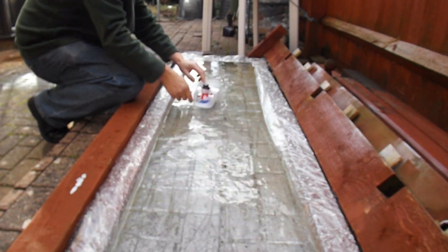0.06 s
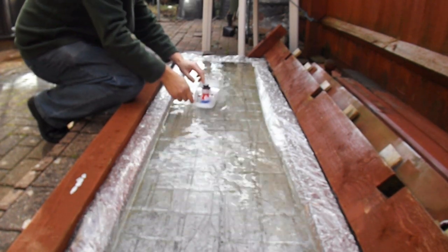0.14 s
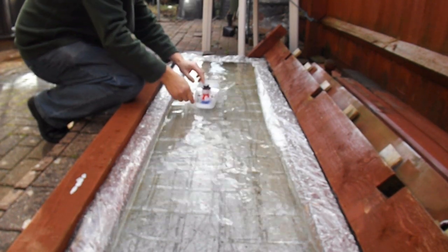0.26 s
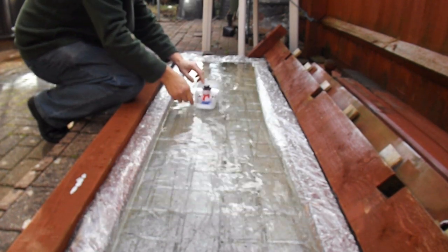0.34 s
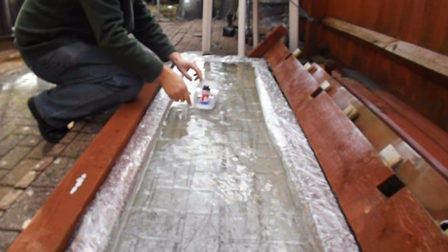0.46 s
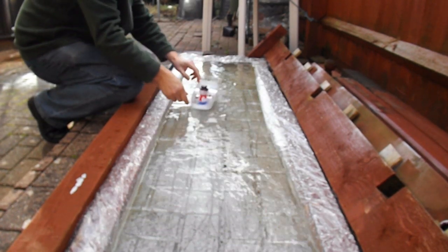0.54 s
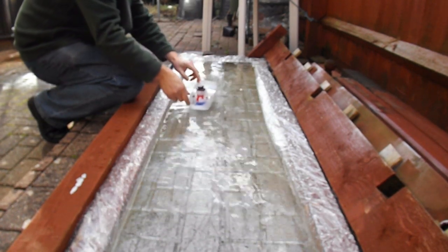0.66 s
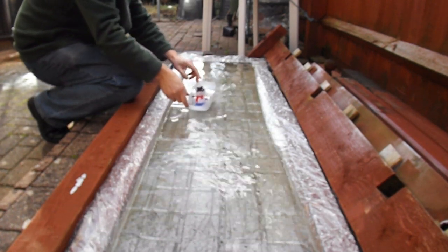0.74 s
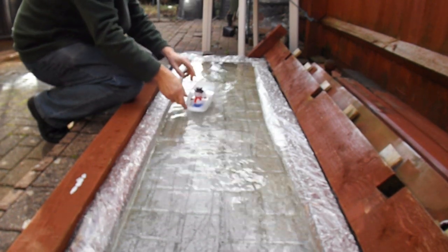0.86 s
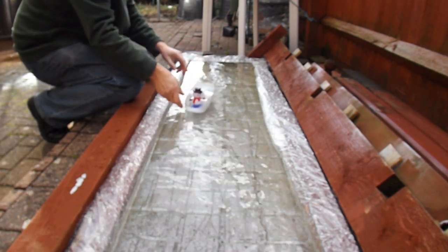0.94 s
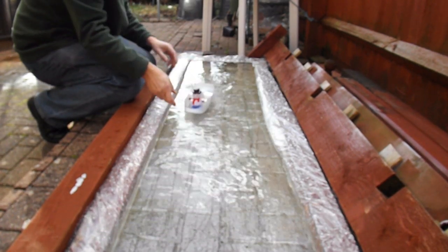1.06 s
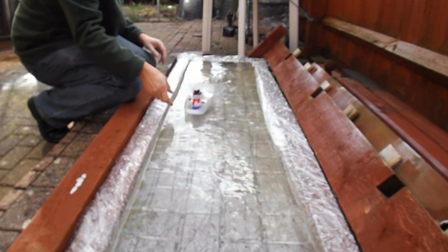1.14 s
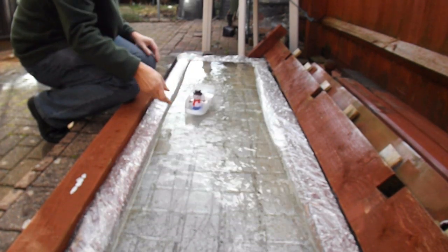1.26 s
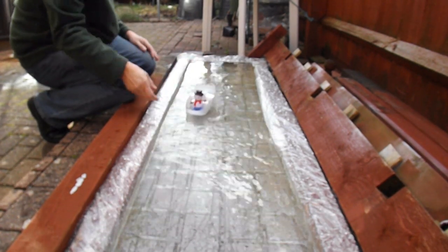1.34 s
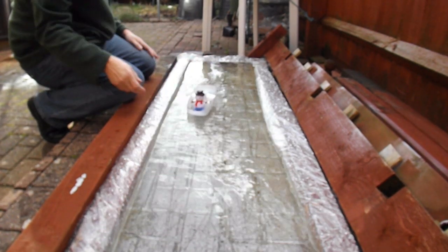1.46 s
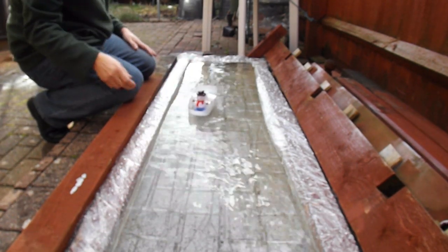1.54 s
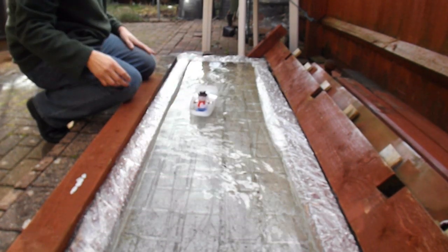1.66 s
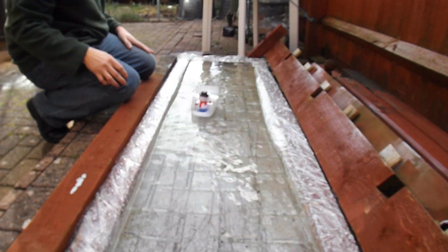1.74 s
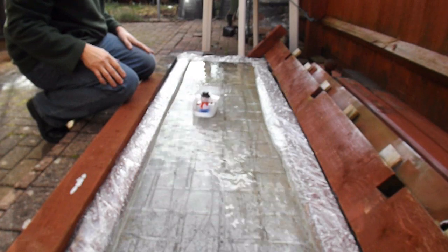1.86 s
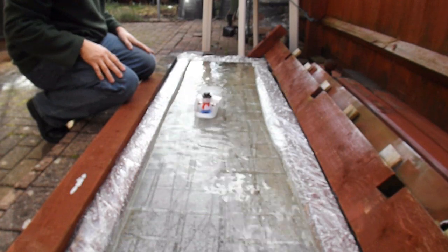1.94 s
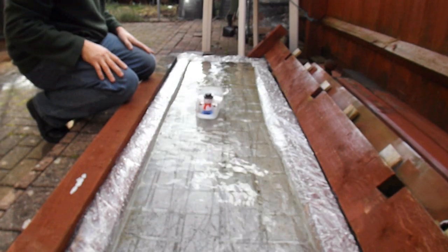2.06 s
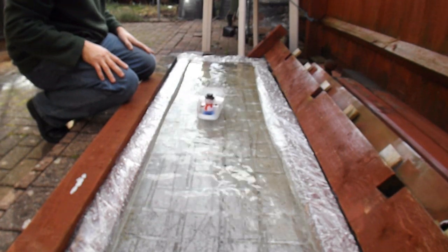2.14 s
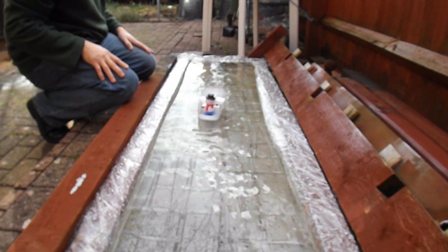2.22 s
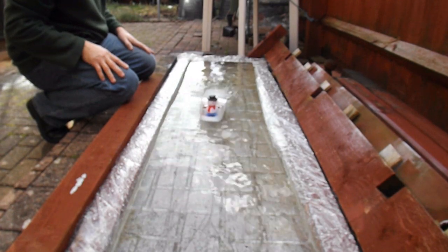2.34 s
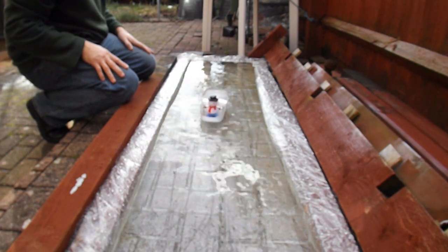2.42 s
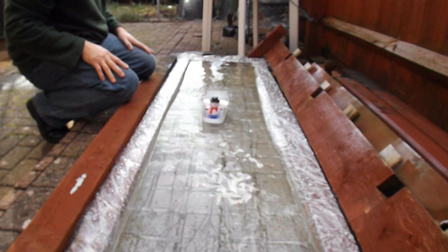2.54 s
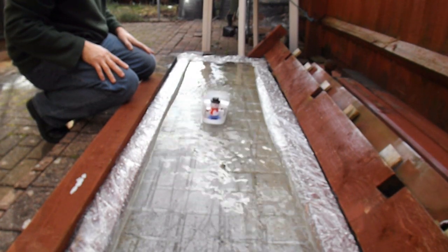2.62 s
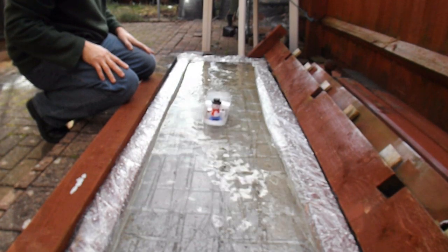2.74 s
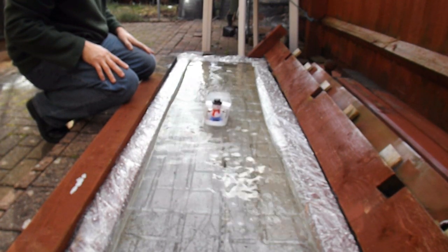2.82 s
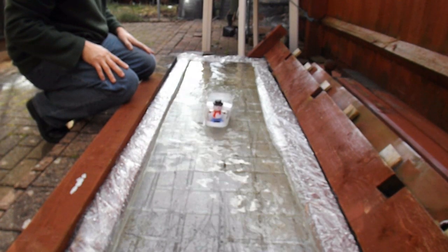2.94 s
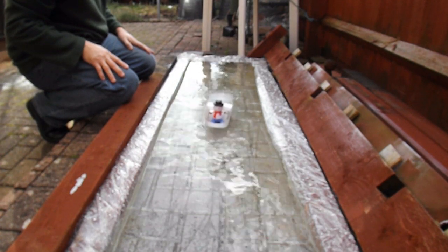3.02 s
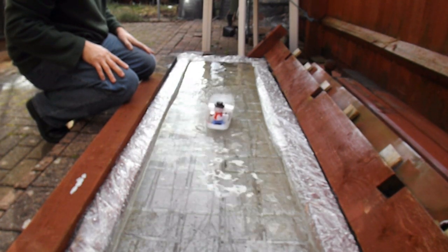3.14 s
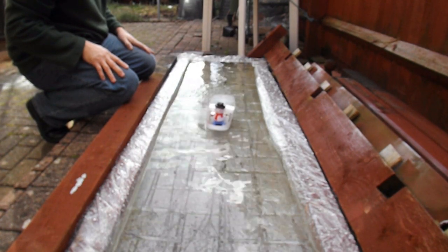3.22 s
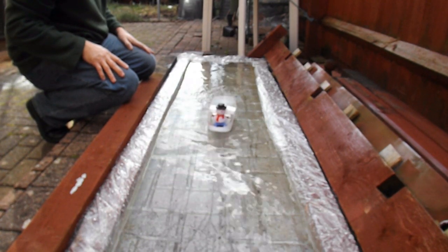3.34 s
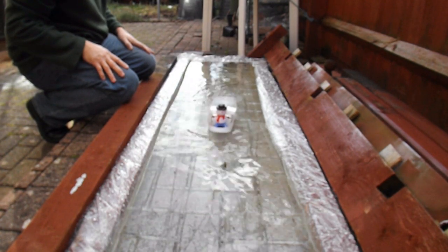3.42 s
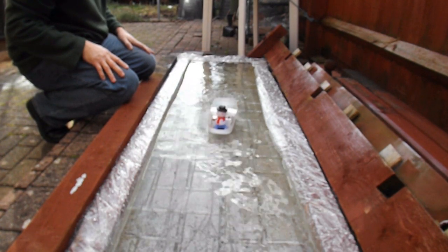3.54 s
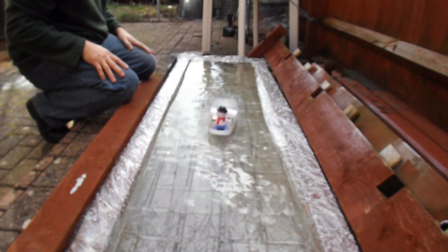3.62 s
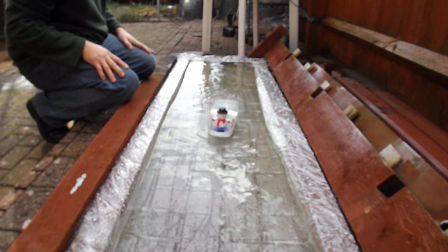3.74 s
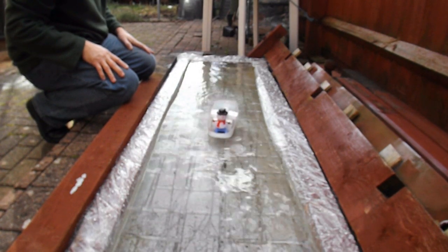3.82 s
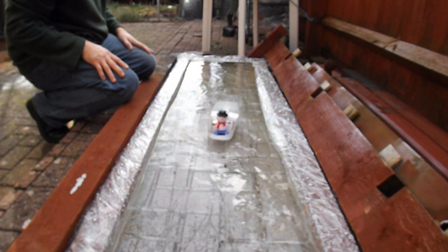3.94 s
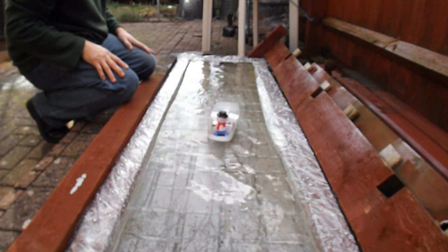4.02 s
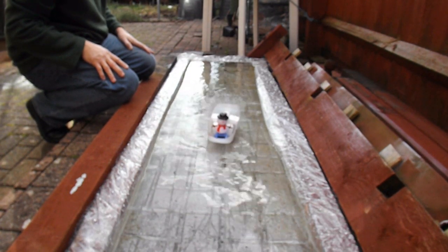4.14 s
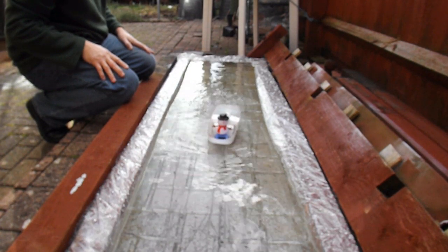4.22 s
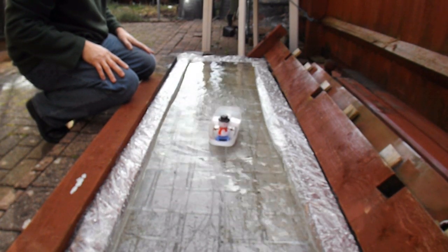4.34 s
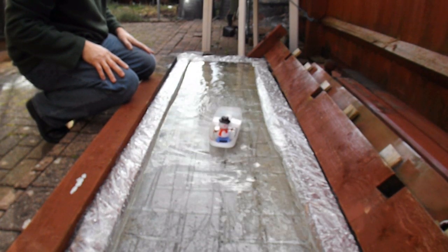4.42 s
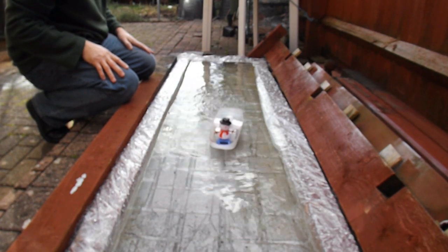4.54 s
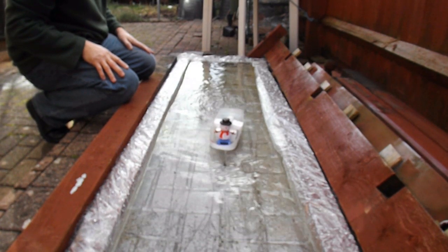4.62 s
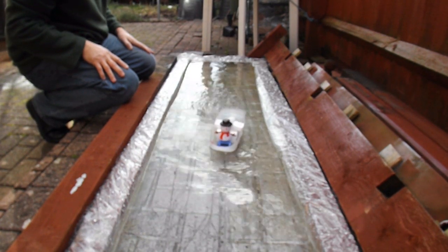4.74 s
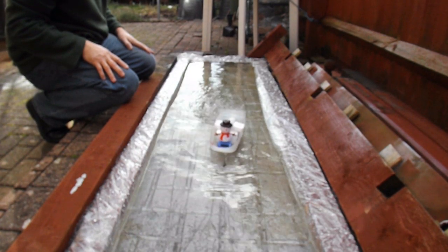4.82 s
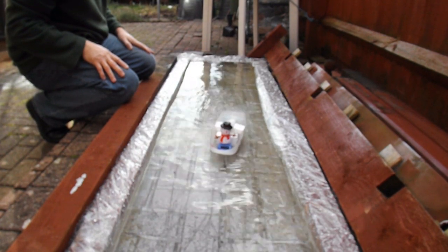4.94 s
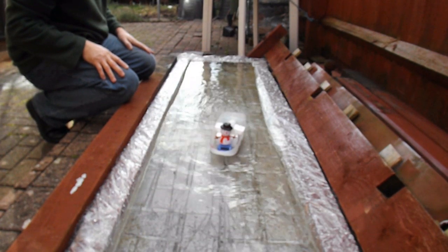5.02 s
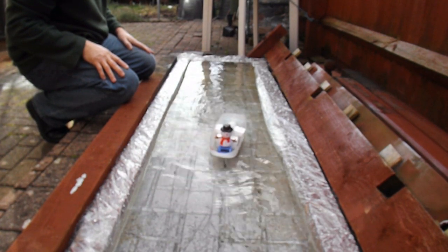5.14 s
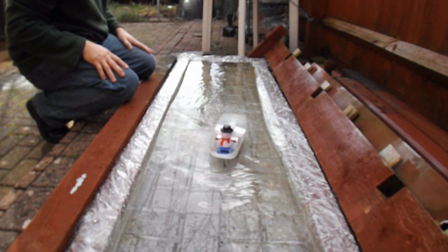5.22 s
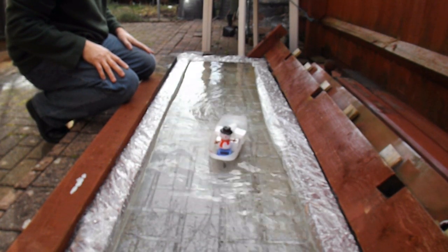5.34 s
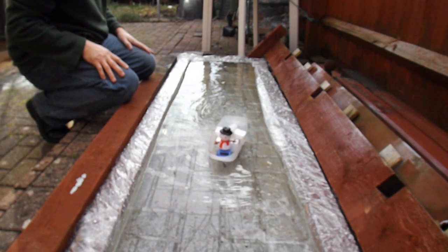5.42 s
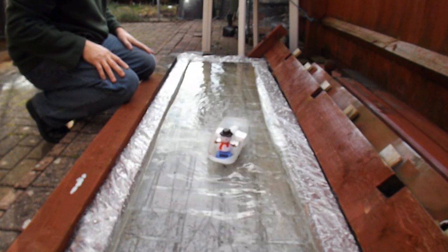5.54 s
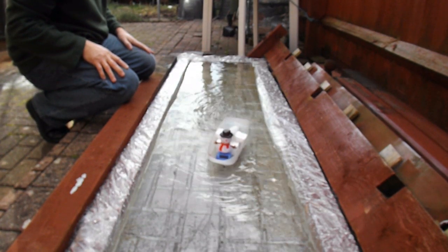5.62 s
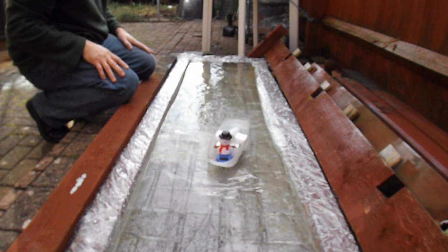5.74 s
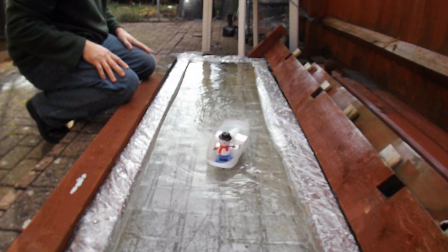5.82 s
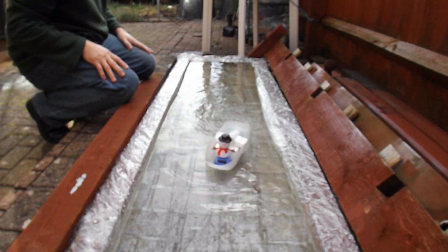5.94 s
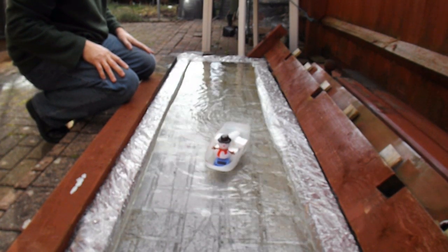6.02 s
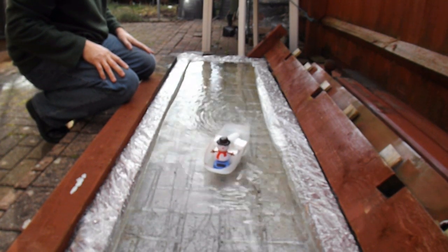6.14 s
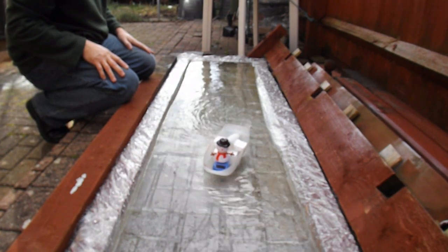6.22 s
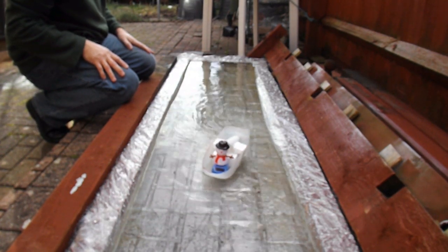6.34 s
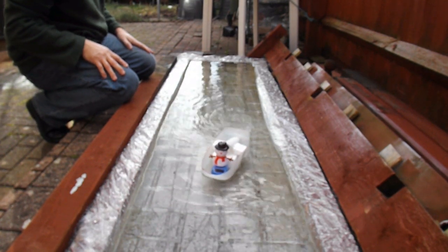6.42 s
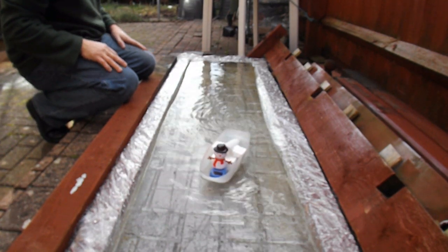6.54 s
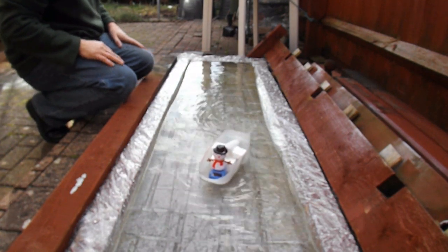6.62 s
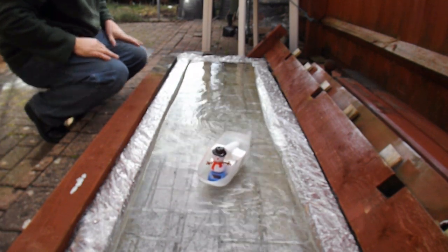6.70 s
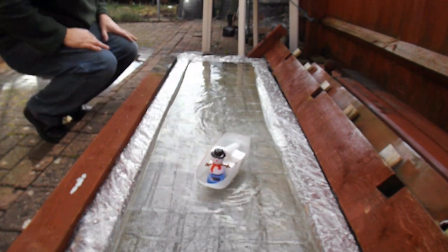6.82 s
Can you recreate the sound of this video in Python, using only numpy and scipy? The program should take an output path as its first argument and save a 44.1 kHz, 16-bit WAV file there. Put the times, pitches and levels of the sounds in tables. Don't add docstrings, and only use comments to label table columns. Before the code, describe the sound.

Outdoors, near a small camera microphone, rough wind puffs blast and pop over a constant raspy electric buzz from a toy boat. The gusts stop after about a second and a half, with one brief puff cluster later. The motor keeps buzzing, low stroke rate with a bright metallic rattle, briefly dipping under load, some overtones ringing out from the plastic hull, with faint hiss and thin high whine beneath.

```python
import sys
import numpy as np
from scipy import signal
from scipy.fft import rfft, irfft, next_fast_len
from scipy.io import wavfile
from scipy.ndimage import uniform_filter1d, map_coordinates

SR = 44100
rng = np.random.default_rng(int(sys.argv[2]) if len(sys.argv) > 2 else 0)


def elevation(decibels):
    levels = np.asarray(decibels, float)
    return 10 ** (levels / 20)


def log_audio(samples):
    frames = np.atleast_2d(samples).T
    limited = np.clip(frames, -1, 1)
    pcm = np.round(limited * 32767).astype(np.int16)
    wavfile.write(sys.argv[1], SR, pcm)


N = 302967
T = np.arange(N) / SR

# time_s, stroke_rate_hz, rattle_db
FREE = [(0.0, 87.9, -50), (0.1, 89.3, -41), (0.3, 89.83, -41.5), (1.0, 90.79, -40), (1.4, 88.4, -41.5),
        (2.0, 88.95, -40.5), (2.35, 88.95, -41.5), (2.7, 89.5, -38.5), (3.3, 88.64, -40.5),
        (3.6, 89.3, -38), (4.1, 90.17, -39.5), (4.4, 89.94, -37.5), (4.9, 89.06, -40), (5.45, 89.3, -38.5),
        (6.2, 89.4, -38), (6.45, 89.56, -37), (6.7, 89.63, -37.5), (6.87, 89.63, -39.5)]
# start_s, length_s, sag_hz
DRAGS = [
    (0.63, 0.24, 2.8),
    (1.693, 0.15, 1.2),
    (2.049, 0.13, 1.5),
    (2.622, 0.16, 1.3),
    (3.05, 0.097, 0.3995),
    (3.75, 0.22, 1.1),
    (4.452, 0.3, 1.1),
    (5.15, 0.23, 1.4),
]


def motor_drive():
    hz, rattle_db = curves(FREE)
    sag = sum(sag_hz * spell(s, length, 0.03, 0.035) for s, length, sag_hz in DRAGS)
    strain_db_per_hz = 0.24
    hz = hz - sag
    rattle_db = rattle_db + strain_db_per_hz * sag
    turns = np.cumsum(hz * (1 + 0.00136 * drift(14.2)[0])) / SR
    return hz, rattle_db, turns


def brush():
    hz, rattle_db, turns = motor_drive()
    body_db = -4.0 + 0.5 * drift(0.97)[0]
    bob_db = 0.8 * drift(10.0)[0]
    rattle_db = rattle_db + bob_db
    shake_db = 0.18 * (rattle_db + 0.5 * body_db + 45.0)
    hull = hum(turns, shake_db) * elevation(0.85 * bob_db)
    gear = gear_rattle(turns, hz, rattle_db, body_db)
    return hull + gear + hull_chatter(turns, shake_db) + shaft_lines(turns, hz)


# order (multiple of the stroke rate), level_db
ORDER_DB = [(1, -69.5), (2, -32), (3, -28.5), (4, -16), (5, -26), (6, -5.5), (7, -14.5), (8, -56), (9, -11),
            (10, -10), (11, -2), (12, -3.5), (13, -25), (14, -6.5), (15, -22.5), (16, -6.5), (17, 0),
            (18, -13.5), (19, -4.5), (20, -8.5), (21, 1), (22, 2.5), (23, -11.5), (24, -6.5), (25, -12.5),
            (26, -13), (27, -19), (28, -15.5), (29, -16.5), (30, -11)]
# order, start_s, length_s, level_db
RINGS = [(21, 0.069, 0.15, -42), (21, 0.23, .2, -45.5), (21, 0.762, 0.16, -47), (21, 2.47, 0.67, -53),
         (21, 3.55, 1.156, -54.5), (21, 6.2, 0.61, -46), (22, 1.97, 0.19, -53), (22, 2.68, .85, -47),
         (22, 3.5, 1.334, -49), (22, 5.0, 1.176, -49), (11, 2.55, 0.22, -46), (17, 1.36, 0.83, -53.5),
         (17, 3.426, 0.62, -56), (17, 4.2, 1.023, -67.5), (17, 5.38, 1.6, -46), (7, 1.358, 1.0, -55),
         (7, 2.356, 3.9, -50), (7, 6.3, .6, -56), (11, 1.49, 0.44, -53.5), (11, 2.021, 0.43, -47.5),
         (11, 3.55, 0.49, -55), (19, 2.04, 0.79, -56), (19, 2.862, 1.0, -54), (19, 3.7, 1.114, -64),
         (19, 4.8, 0.71, -49.5), (6, 2.44, 4.6, -57), (12, 5.7, 1.1, -59), (14, 5.37, .9, -55.5),
         (4, 5.4, 1.8, -66.5), (16, 3.735, 1.28, -55)]


def hum(turns, shake_db):
    hum_db, idle_db, catch_s = -49, -7, 0.021
    fades = drift(1.56, count=len(ORDER_DB))
    slips = drift(3.6, count=len(ORDER_DB))
    out = np.zeros(N)
    for (k, db), fade, slip in zip(ORDER_DB, fades, slips):
        rings = [elevation(ring_db) * spell(s, length, catch_s, catch_s)
                 for order, s, length, ring_db in RINGS if order == k]
        base_db = hum_db + db + 1.86 * fade + shake_db + (idle_db if rings else 0)
        gain = (elevation(base_db) + sum(rings)) * elevation(0.045 * k * slip)
        phase = 2 * np.pi * (k * turns + rng.random()) + 0.49 * slip
        out += np.sqrt(2) * gain * np.cos(phase)
    return out


# frequency_hz, level_db
RATTLE = [(1410, -29.5), (2400, -12.5), (2680, -10), (3080, -14), (3710, -3), (3970, -2.5), (4410, -10.5),
          (4820, -6), (5240, -8), (6810, -5), (7500, -4), (7870, -2), (9350, -16.5), (12500, -34.5),
          (16200, -65), (22000, -120)]


def gear_rattle(turns, hz, rattle_db, body_db):
    loose = 0.3 + 0.06 * uniform_filter1d(abs(np.gradient(hz)) * SR, 3000)
    rattle = colour(strokes(turns, memory=11.0, sharp=1.6, fresh=loose), RATTLE)
    lowpass = signal.butter(3, 5300, fs=SR, output="sos")
    body = signal.sosfiltfilt(lowpass, rattle)
    bright = elevation(rattle_db - 0.12) * evened(rattle - body)
    return bright + elevation(rattle_db + body_db - 0.55) * evened(body)


# frequency_hz, level_db
CHATTER = [(24, -60), (40, -56), (220, -16), (355, -13.5), (475, -9), (531, -10), (686, -1.5), (1590, -2.5),
           (1920, -4), (3200, -14.5), (4160, -80), (7040, -120)]


def hull_chatter(turns, shake_db):
    chatter = colour(strokes(turns, memory=2.7, sharp=4.2, fresh=1.68), CHATTER)
    return elevation(-46 + shake_db) * evened(chatter)


# frequency_hz (at mean speed), level_db
MOTOR = [(147, -75.5), (1670, -113.5), (1942, -63), (2112, -72)]


def shaft_lines(turns, hz):
    out = np.zeros(N)
    for (f, db), d in zip(MOTOR, drift(1.5, count=len(MOTOR))):
        out += elevation(db + 2.0 * d) * np.cos(2 * np.pi * f * turns / hz.mean())
    return out


def strokes(turns, memory, sharp, fresh):
    cycles = int(turns[-1]) + 2
    keep = np.exp(-1 / memory)
    draws = rng.standard_normal((2, cycles + 99, 180))
    a, b = signal.lfilter([1], [1, -2 * keep, keep ** 2], draws, axis=1)[:, 99:]
    draws = rng.standard_normal((2, cycles, 180))
    c, d = signal.lfilter([1], [1, -keep ** 4], draws, axis=1)
    orders = evened(a + 1j * b) + (np.arange(180) / 143.5) ** 2 * evened(c + 1j * d)
    place = turns % 1
    repeat = evened(map_coordinates(irfft(orders, 2048), [turns, place * 2047], order=1))
    forth = np.exp(-place / 0.13)
    back = 0.4 * np.exp(-((place - 0.5) % 1) / 0.35)
    knock = (1 + sharp * forth + sharp * back) * elevation(0.52 * drift(26.08)[0])
    mixed = (repeat + fresh * rng.standard_normal(N)) / np.sqrt(1 + fresh ** 2)
    return evened(knock * mixed)


# time_s, level_db
WIND = [(0.0, -33.5), (0.35, -30.5), (0.45, -35), (0.75, -30), (1.34, -29.5), (1.45, -47), (1.75, -55),
        (2.3, -57), (2.5, -50.5), (3.2, -55.5), (3.3, -76), (4.05, -54), (4.2, -63.5), (6.87, -64.5)]


def wind():
    lull_db = curves(WIND)[0]
    level_db = 20 * np.log10(elevation(lull_db) + elevation(-22.5) * wake(GUSTS + PUFFS, 0.027))
    return eddies(lull_db) + snaps() + rumble(level_db) + tear() + breeze(level_db)


# centre_s, peak_db, pitch_hz, length_s
GUSTS = [(.0581, -23.5, 455, .0045), (.1208, -17.5, 462, 0.0026), (.184, -23.5, 341, 0.0076),
         (.2543, -23.5, 349.5, 0.023), (.2688, -17, 480.8, .0052), (.2766, -18, 505.6, 0.0089),
         (.4571, -21.5, 453, 0.0017), (.5504, -15, 366.5, 0.0032), (.63, -23, 327.7, 0.0067),
         (.6989, -20.5, 526, 0.012), (.7116, -16, 538, 0.0028), (.7197, -11, 572, 0.0025),
         (.7773, -22, 426, 0.012), (.7928, -12.5, 512, 0.0019), (.8056, -24, 539, 0.012),
         (.9339, -18, 437.6, 0.0025), (1.012, -18.5, 559.4, .0053), (1.0434, -23, 480, .012),
         (1.0665, -14, 512, .007), (1.0771, -12, 636, .0032), (1.1115, -10, 639.4, .014),
         (1.142, -14, 517, 0.023), (1.162, -15, 544, .022), (1.188, -19, 576, 0.011),
         (1.21, -12.5, 563, 0.0055), (1.2269, -14.5, 490, 0.0068), (1.3182, -12, 614, .0035),
         (1.3345, -22, 595, 0.0064), (1.3522, -19, 490, .006), (2.7375, -21, 500, .003)]
# centre_s, peak_db
PUFFS = [(.218, -30.5), (0.3408, -23), (0.358, -28), (0.681, -26), (0.849, -29), (0.903, -27), (0.957, -29),
         (0.991, -29.5), (1.093, -23), (1.2395, -29), (1.265, -24), (1.2915, -25.5), (1.506, -39.5),
         (1.5344, -33.5), (1.553, -33.5), (1.6621, -34), (2.059, -41.5), (2.3629, -45), (2.4449, -32),
         (2.5147, -38), (2.6872, -40), (2.731, -27), (2.774, -34.5), (3.1645, -42), (3.4986, -43.5),
         (3.06, -47), (3.8829, -45.5), (4.0424, -43.5), (4.096, -48), (4.116, -42)]


def eddies(lull_db):
    when, size = rng.random((2, round(25 * N / SR)))
    when = when * (N - 1) / SR
    small = list(zip(when, np.interp(when, T, lull_db) - 0.25 + 8.2 * size))
    rows = list(GUSTS)
    for s, db in PUFFS + small:
        rows.append((s, db, max(397.6 + 17.0 * (db + 25), 190), 0.008))
    out = np.zeros(N + 3000)
    for (s, *rest), luck in zip(rows, rng.standard_normal((len(rows), 3000))):
        out[round(s * SR):][:3000] += elevation(-2.7) * puff(*rest, luck)
    return port(out[1500:N + 1500])


def puff(peak_db, hz, length, luck):
    t = np.arange(-1500, 1500) / SR
    wobble = 0.3 * min(length / 0.009, 1) * evened(uniform_filter1d(luck, 60))
    phase = 2 * np.pi * np.cumsum(hz * (1 + wobble)) / SR
    swing = np.sin(phase) + 0.33 * np.sin(2 * phase)
    swing += 0.029 * np.sin(3 * phase) + 0.015 * np.sin(4 * phase)
    u = t / np.clip(length, 0.002, 0.03) * np.where(t > 0, 2.3, 1.8)
    swell = np.exp(-0.7 * abs(u) ** np.where(t > 0, 2.2, 4.0))
    uneven = elevation(2.1 * evened(uniform_filter1d(luck[::-1], 50)))
    return elevation(peak_db) * swing * swell * uneven


# centre_s, peak_db
SNAPS = [(0.0054, -21.5), (0.1196, -23), (0.1304, -38), (0.2159, -22), (0.2423, -31), (0.4554, -34),
         (0.7173, -25), (0.7911, -29), (0.8824, -27), (0.9328, -25.5), (1.0091, -23), (1.062, -32),
         (1.076, -33), (1.1684, -27), (1.2276, -32), (1.2974, -26), (1.3169, -29), (2.7364, -26)]


def snaps():
    u = np.arange(-60, 60) / SR / 0.00012
    out = np.zeros(N + 3000)
    for s, db in SNAPS:
        out[round(s * SR) + 1500:][:120] += elevation(db + 6.0) * u * np.exp(-u ** 2 / 2)
    return port(out[1500:N + 1500])


def port(x):
    return signal.lfilter(*signal.butter(2, 130, "high", fs=SR), x)


# frequency_hz, level_db
TEAR = [(150, -33), (400, -12), (700, -0.5), (1300, -21.5), (2200, -28), (4000, -60)]


def tear():
    gain = elevation(12.0 + 4.8 * drift(120)[0]) * wake(GUSTS, 0.007) ** 1.68
    return colour(gain * rng.standard_normal(N), TEAR)


# frequency_hz, level_db
EDDY = [(30, -63), (100, -12), (200, -4), (330, -4.5), (600, -10.5), (1200, -16.5), (3000, -49.5)]


def rumble(level_db):
    lumps = elevation(level_db - 6.0 + 5.5 * drift(77)[0])
    return colour(lumps * rng.standard_normal(N), EDDY) * elevation(17.5)


# frequency_hz, level_db
BREEZE = [(20, -8), (60, 4), (130, 4), (260, -31), (600, -50)]


def breeze(level_db):
    calm = np.interp(T, (4.2, 4.8), (0, -14.0))
    push = elevation(0.49 * level_db - 21.0 + calm + 4.5 * drift(16)[0])
    return colour(push * rng.standard_normal(N), BREEZE)


def wake(rows, length):
    marks = np.zeros(N)
    for s, db, *_ in rows:
        marks[round(s * SR)] += elevation(db)
    bell = np.exp(-(np.arange(-4000, 4001) / SR / length) ** 2)
    return abs(signal.oaconvolve(marks, bell, "same"))


# frequency_hz, level_db
FIZZ = [(3000, -84), (8000, -66), (10000, -45.5), (12000, -62.5), (14000, -59.5), (16000, -58)]


def spray():
    return colour(rng.standard_normal(N), FIZZ)


def duck_db(x):
    threshold_db, share, recover_db_per_s = -31.5, 0.44, 179
    power_db = 10 * np.log10(abs(uniform_filter1d(x ** 2, 600)) + 1e-12)
    fall = T * recover_db_per_s
    held_db = np.maximum.accumulate(power_db + fall) - fall
    return -share * uniform_filter1d(np.maximum(held_db - threshold_db, 0), 300)


def evened(x):
    return x / np.sqrt(np.mean(abs(x) ** 2) + 1e-20)


def curves(rows):
    s, *columns = np.transpose(rows)
    return [np.interp(T, s, c) for c in columns]


def colour(x, points):
    f, db = np.transpose(points)
    size = next_fast_len(N)
    hz = np.fft.rfftfreq(size, 1 / SR)
    gain = elevation(np.interp(np.log(hz + 1), np.log(f + 1), db))
    return irfft(rfft(x, size) * gain, size)[:N]


def drift(per_s, count=1):
    step = np.arange(N // 256 + 2) * 256 / SR
    z = rfft(rng.standard_normal((count, len(step))))
    hz = np.fft.rfftfreq(len(step), 256 / SR)
    z = irfft(z / (1 + (hz / per_s) ** 2), len(step))
    return [np.interp(T, step, evened(row)) for row in z]


def spell(start, length, edge, last_edge):
    rise = np.tanh((T - start) / edge)
    fall = np.tanh((T - start - length) / last_edge)
    return np.clip(rise - fall, 0, 2) / 2


def scene():
    air = wind()
    mono = (brush() + spray()) * elevation(duck_db(air)) + air
    return np.tile(mono, (2, 1))


# frequency_hz, level_db
WHINE = [
    (9776, -66),
]


def whine():
    return sum(np.sqrt(2) * elevation(db) * np.sin(2 * np.pi * f * T) for f, db in WHINE)


# frequency_hz, level_db
HISS = [(500, -107), (4000, -82), (8000, -54), (12000, -74), (16000, -85)]


def hiss():
    return colour(rng.standard_normal(N), HISS) * [[1], [-1]]


def roll_off(x):
    return signal.sosfilt(signal.butter(12, 15750, fs=SR, output="sos"), x)


def record(dry):
    x = signal.lfilter(*signal.iirnotch(7005, 7005 / 60, SR), dry)
    x = x + 0.8 * signal.lfilter(*signal.iirpeak(7230, 16.0, SR), x)
    x = x + whine()
    late = np.roll(x[0], 1)
    highpass = signal.butter(1, 350, "high", fs=SR, output="sos")
    side = signal.sosfiltfilt(highpass, late - x[1]) / 2
    x = (late + x[1]) / 2 + side * [[1], [-1]] + hiss()
    edge = signal.firwin(511, 15700, window=("kaiser", 9), fs=SR)
    mix = signal.oaconvolve(x, edge[None], "same")
    return roll_off(mix)


dry = scene()
out = record(dry)
log_audio(out)
```